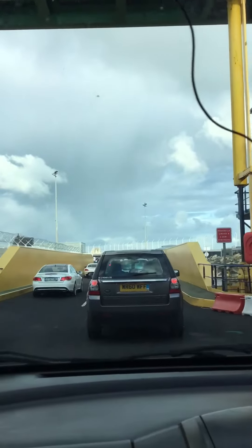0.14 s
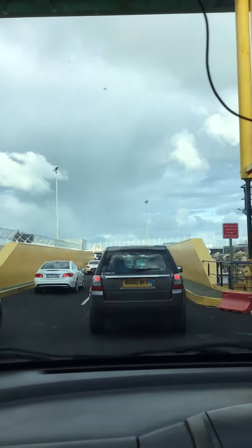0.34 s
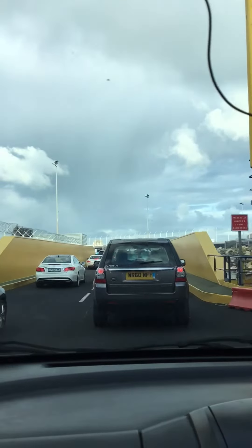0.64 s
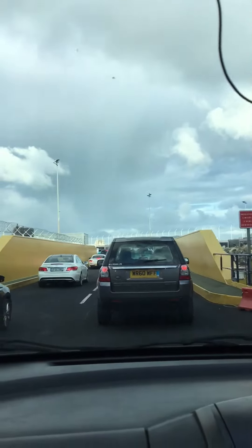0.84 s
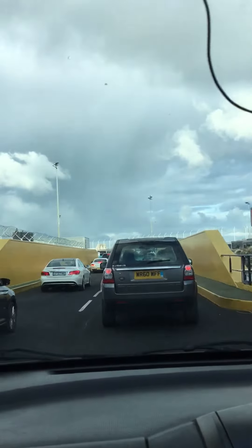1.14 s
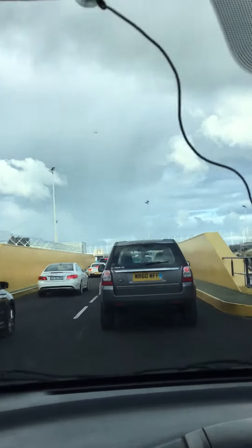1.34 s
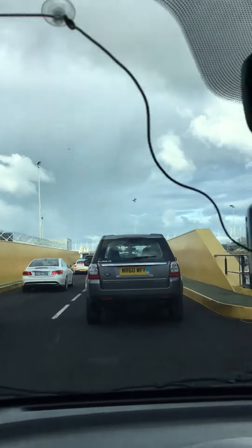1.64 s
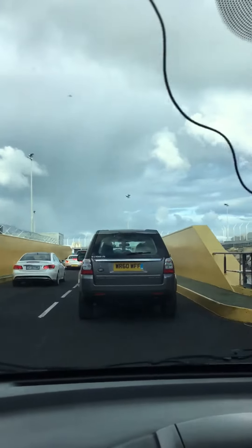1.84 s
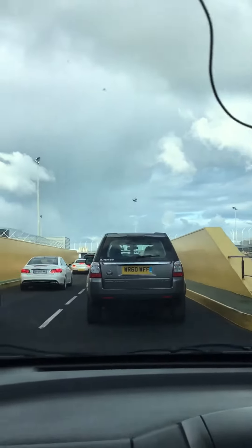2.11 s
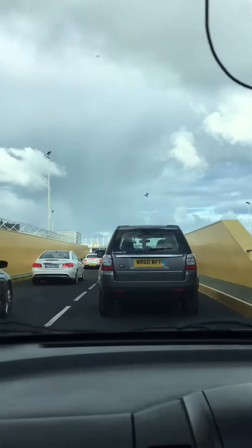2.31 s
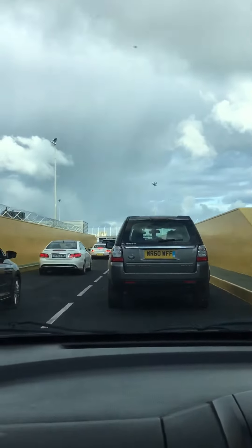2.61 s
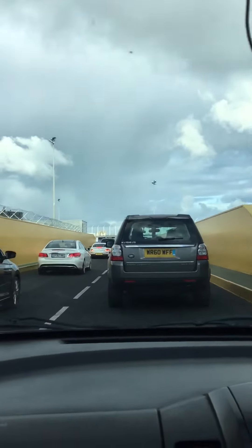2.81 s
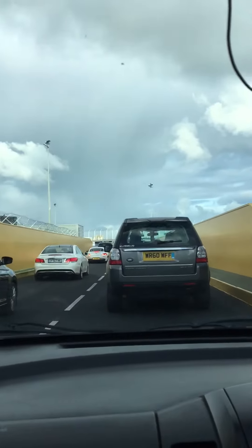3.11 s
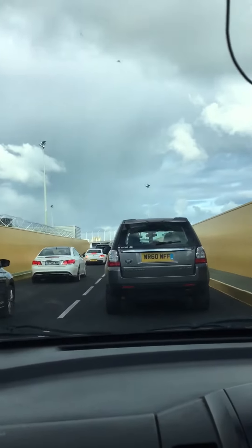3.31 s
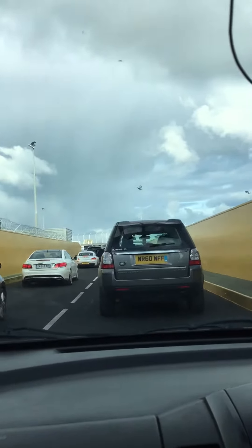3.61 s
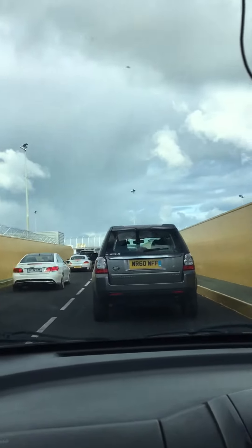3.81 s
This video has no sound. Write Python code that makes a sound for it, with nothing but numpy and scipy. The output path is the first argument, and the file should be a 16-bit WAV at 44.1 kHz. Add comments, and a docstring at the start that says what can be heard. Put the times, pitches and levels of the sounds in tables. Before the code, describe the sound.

Inside a slowly moving car, a low, wavering engine drone and muffled road rumble run throughout, with very faint window air. A boomy thump lands near 1.2 seconds, then clanking knocks cluster from 1.35 to 1.9, hardest around 1.65. Softer bumps follow near 2.3 and 3.0, a sharper plate knock at 3.55, and small trim ticks around 2.0 and 3.9. Close, bass-heavy phone pickup.

```python
"""Inside a car rolling slowly down a steel ramp, heard by a hand-held phone.
The engine drones as wandering sine orders; road and window air are coloured noise that flickers.
Body resonances murmur as narrow noise; joint thumps ring them as sines and clank the plate as noise.
A few plate notes sing out as dying sines, loose trim ticks in short noise scrapes,
and faint rustles come as patches of dense treble clicks."""
import sys
import numpy as np
from scipy import signal
from scipy.fft import rfft, irfft
from scipy.io import wavfile
from scipy.ndimage import uniform_filter1d

SR = 44100
rng = np.random.default_rng(int(sys.argv[2]) if len(sys.argv) > 2 else 0)


def wrap_up_sound(samples):
    """Save the sound to the file named by the first command line argument, as 16-bit audio."""
    columns = np.atleast_2d(samples).T
    # keep every value between -1 and 1, then stretch to whole-number steps
    tamed = np.clip(columns, -1, 1)
    steps = np.round(tamed * 32767).astype(np.int16)
    wavfile.write(sys.argv[1], SR, steps)


N = 174195  # samples

# Engine drone in the cabin boom. Each row: time in seconds, firing pitch in Hz before its wander,
# level in dB before the order balance.
ENGINE_DRONE = [(0.0, 62.2, -28.5), (0.08, 59.1, -29), (0.15, 59.8, -28.5), (0.19, 60.6, -38),
                (0.22, 60.2, -28), (0.3, 58.9, -38), (0.36, 57, -26), (0.42, 58, -44), (0.49, 55.1, -27.5),
                (0.57, 55.8, -39), (0.65, 56.3, -29), (0.74, 57.9, -49), (0.81, 58.03, -25),
                (0.83, 57.94, -35), (0.88, 58.1, -23), (0.93, 57.96, -41), (1.0, 57.95, -23),
                (1.02, 60, -44), (1.08, 59.25, -25.5), (1.14, 58.7, -36.5), (1.59, 58.77, -24.5),
                (1.64, 57.03, -32), (1.72, 59.6, -20.5), (1.79, 63.8, -49), (1.88, 58.7, -26.5),
                (1.92, 57.55, -24), (1.98, 56.5, -21.5), (2.08, 56.1, -62), (2.18, 54.8, -33.5),
                (2.3, 62.9, -29.5), (2.35, 63, -16), (2.5, 63.6, -39), (2.58, 57.6, -37), (2.76, 58.5, -44),
                (2.83, 55.7, -29), (2.93, 56.24, -49), (2.99, 54.57, -29.5), (3.07, 53.1, -31.5),
                (3.23, 58.06, -35), (3.28, 59.6, -40), (3.3, 59.66, -31), (3.53, 60.03, -33),
                (3.6, 60.0, -16.5), (3.64, 58.5, -26.5), (3.76, 53.2, -35), (3.78, 54.2, -32),
                (3.83, 54.14, -41), (3.95, 52.96, -21.5)]
# Engine orders. Each row: multiple of the firing pitch, balance in dB.
ENGINE_ORDERS = [(1, -1), (1.5, -15.5), (2, -16), (3, -23.5)]
FIRING_WANDER = 0.0288  # fraction of the pitch
LUMP_DB = 2  # spread for the firing order itself; grows with the multiple

# Colour of the road noise through the body. Each row: frequency in Hz, relative level in dB per Hz.
ROAD_COLOUR = [(20, -44.5), (32, -4.5), (45, -0.5), (65, -5.5), (85, -4.5), (159, -5.5), (210, -8.5),
               (261, -15.5), (340, -17), (419, -23), (720, -25.5), (880, -31), (1660, -40.5), (3000, -59),
               (6000, -82.5)]
# Road loudness. Each row: time in seconds, rms level in dB within the road band.
ROAD_LOUDNESS = [(0.0, -44), (0.68, -47.5), (1.0, -49.5), (1.68, -37), (2.02, -47), (2.51, -42.5),
                 (2.88, -48), (3.29, -45), (3.95, -44.5)]
# Colour of the air hiss at the windows. Each row: frequency in Hz, relative level in dB per Hz.
AIR_COLOUR = [(800, -2), (1600, 0), (3000, -8), (5500, -16), (7200, -25.5), (8600, -24), (10000, -30.5),
              (15700, -33.5)]
# Air loudness. Each row: time in seconds, rms level in dB within the air band.
AIR_LOUDNESS = [(0.0, -58), (1.52, -61), (1.65, -58.5), (1.97, -63), (2.62, -62.5), (3.9, -61.5)]
ROAD_BAND_HZ, AIR_BAND_HZ = (300, 1500), (2000, 7000)  # where the loudness is set
SWELL_DB, FLICKER_DB = 1.2, 1.37  # spread of the shared swell and of each slice's own flicker

# Body resonances rung by road and thumps. Each row: pitch in Hz, 60 dB decay time in seconds,
# rms level in dB of the road's murmur.
BODY_MODES = [(113.7, 0.34, -42.5), (143.8, 0.28, -42.5), (181.1, 0.17, -46.5), (204.8, 0.33, -46.5),
              (347.8, 0.17, -58)]

# Tiny-click rustles near the phone. Each row: start in seconds, length in seconds, peak rms level in dB.
RUSTLE_PATCHES = [(.08, .16, -80), (1.9, 0.12, -76), (2.269, .15, -73)]
RUSTLE_CLICKS_PER_S, RUSTLE_HZ, RUSTLE_WIDTH_HZ = 970, 10987, 10000

# Wheel thumps over the joints. Each row: start in seconds, rise in seconds, 60 dB decay time in seconds,
# rms levels in dB of the five body rings, then of the plate's thud, low clank, high clank and rattle.
JOINT_THUMPS = [(.935, 0.0083, 0.99, -48, -47.5, -48, -55.5, -75, -47, -51.5, -57, -89),
                (1.185, 0.014, 0.4, -18, -44, -28, -24.5, -39, -37.5, -42.5, -56, -75.5),
                (1.355, 0.0056, 0.3, -35, -37.5, -39, -33.5, -44, -45, -47, -59.5, -77),
                (1.465, 0.02, 0.39, -30.5, -34.5, -32, -33.5, -38.5, -41, -36.5, -40.5, -58.5),
                (1.554, 0.013, 0.67, -40.5, -33, -38, -36, -45, -49.5, -46.5, -60, -69.5),
                (1.615, 0.014, 0.44, -24, -35, -44.5, -30.5, -28, -27, -42, -43.5, -67),
                (1.66, 0.0027, 0.22, -27.5, -32, -27, -34, -32, -29.5, -33, -41, -40),
                (1.701, 0.0073, 0.53, -23.5, -20.5, -33, -24.5, -33, -30.5, -46, -57, -61.5),
                (1.885, 0.027, 0.56, -32, -31.5, -39, -29.5, -42, -42, -45, -69, -64.5),
                (2.280, 0.023, 0.49, -32, -37, -32, -40, -42, -37, -40.5, -48.5, -65.5),
                (2.340, 0.069, 1, -49, -37, -25.5, -37.5, -45, -45, -42, -57, -73.5),
                (3.012, 0.06, .6, -30, -40.5, -25, -47, -50, -40, -41.5, -50.5, -67),
                (3.080, .11, 0.76, -38, -44, -38.5, -41, -45, -47.5, -45, -54.5, -69),
                (3.546, 0.0046, 0.79, -49, -34.5, -34, -35, -39, -31.5, -36.5, -44, -61.5),
                (3.749, 0.016, 2.8, -55, -44, -38, -34, -48.5, -68, -78, -83, -101)]
# Plate resonances, grouped as thud, low clank, high clank and rattle.
# Each row in a group: pitch in Hz, width in Hz, balance in dB within the group.
PLATE_GROUPS = [
    [(255, 113, 3), (390, 119, -6.5), (518, 144, -3)],
    [(633, 193, 4), (749, 145, 2.5), (955, 170, -3), (1150, 280, -4.5)],
    [(1384, 330, 5.5), (1670, 320, 1), (1936, 470, 0.5), (2415, 600, -3.5)],
    [(3560, 800, 5.5), (4350, 870, -1.5), (5180, 540, -8.5), (6658, 600, -17.5)],
]
RING_WOBBLE = 0.0301  # fraction of the pitch

# Clear plate notes in the harder knocks. Each row: start in seconds, pitch in Hz, rms level in dB,
# rise in seconds, 60 dB decay time in seconds.
PLATE_PINGS = [(1.19, 744, -41, 0.0052, 0.22), (1.468, 1520, -41.5, 0.0033, 0.091),
               (1.485, 1340, -44, .005, .1), (1.49, 656, -40, .006, 0.24),
               (1.489, 3540, -54.5, .008, 0.098), (1.668, 977, -34.5, .015, 0.21),
               (1.725, 736, -38.5, 0.0071, .2), (2.36, 1292, -50, 0.018, 0.28),
               (3.547, 490, -31.5, 0.017, 0.21), (3.547, 1490, -40.5, 0.012, 0.1)]

# Trim ticks. Each row: start in seconds, length in seconds (loudest halfway), dull level in dB,
# bright level in dB, dull pitch in Hz.
TRIM_TICKS = [(1.7125, 0.0038, -64, -62, 3600), (1.923, 0.0044, -62, -65, 3730),
              (1.941, 0.0046, -64, -65, 3400), (2.011, 0.0034, -72, -62, 3610),
              (2.0165, 0.016, -54, -61.5, 3500), (2.333, 0.0038, -64, -68, 3400),
              (2.365, 0.0041, -72, -73.5, 3400), (2.39, 0.0038, -70, -71, 3370),
              (2.8208, 0.002, -54, -59.5, 3800), (3.902, 0.0043, -54, -75, 3535),
              (3.919, .012, -46, -81, 2335)]
DULL_WIDTH_HZ, BROAD_HZ, BROAD_WIDTH_HZ = 720, 8500, 10000
SQUEAK_HZ, SQUEAK_WIDTH_HZ = 11800, 1600
SQUEAK_FULL_DB, SQUEAK_FULL_S = 9, 0.018  # dB over the hiss in a tick of this length; shorter ones get less

MIC_LOW_HZ, TOP_HZ = 34.8, 15750


def undb(db):
    """dB to gain."""
    return 10 ** (np.asarray(db) / 20)


def unit(x):
    """Scale to rms 1."""
    return x / np.sqrt(np.mean(x ** 2))


def curve(table, column=1):
    """A column of a time table, drawn sample by sample with straight lines."""
    rows = np.array(table)
    return np.interp(np.arange(N) / SR, rows[:, 0], rows[:, column])


def band(hz, width_hz, count=N):
    """Noise through a resonance applied twice, rms 1."""
    b, a = signal.iirpeak(hz, hz / width_hz, fs=SR)
    noise = rng.standard_normal(count + 2000)
    once = signal.lfilter(b, a, noise)
    return unit(signal.lfilter(b, a, once)[2000:])  # skip the filter's start-up


def walk(rate):
    """Random levels, rate per second, smoothed twice; spread near 1."""
    hold = int(SR / rate)
    steps = np.repeat(rng.standard_normal(N // hold + 1), hold)
    return 1.3 * uniform_filter1d(uniform_filter1d(steps, hold), hold)[:N]


def coloured(colour, edges):
    """Coloured noise, rms 1 between the edges before its half-octave slices swell together and flicker alone."""
    hz = np.maximum(np.arange(N // 2 + 1) * SR / N, 1)
    rows = np.array(colour)
    tilt_db = np.interp(np.log(hz), np.log(rows[:, 0]), rows[:, 1], left=-99)
    spectrum = rfft(rng.standard_normal(N)) * undb(tilt_db)
    in_band = (hz > edges[0]) * (hz < edges[1])
    spectrum = spectrum / np.std(irfft(spectrum * in_band, N))
    place = 2 * np.log2(hz / 20)  # half octaves above 20 Hz
    swell = SWELL_DB * walk(5.94)
    out = np.zeros(N)
    for k in range(21):
        piece = irfft(spectrum * np.clip(1 - abs(place - k), 0, 1), N)
        out += piece * undb(swell + FLICKER_DB * walk(14))
    return out


def strike(t, rise, t60):
    """Knock envelope: a straight rise, then an exponential fall of 60 dB in t60."""
    return np.clip(t / rise, 0, 1) * np.exp(-np.log(1000) * np.maximum(t - rise, 0) / t60)


def engine():
    """Firing orders on one wandering pitch, each lumping in level on its own."""
    turns = np.cumsum(curve(ENGINE_DRONE) * (1 + FIRING_WANDER * walk(12))) / SR
    tone = np.zeros(N)
    for multiple, db in ENGINE_ORDERS:
        lump_db = LUMP_DB * multiple * walk(14)
        tone += undb(db + lump_db) * np.sin(2 * np.pi * (multiple * turns + rng.random()))
    return np.sqrt(2) * tone * undb(curve(ENGINE_DRONE, column=2))


def road():
    """Tyre rumble through the floor and air past the windows, both as broad coloured noise."""
    tyres = coloured(ROAD_COLOUR, ROAD_BAND_HZ) * undb(curve(ROAD_LOUDNESS))
    air = coloured(AIR_COLOUR, AIR_BAND_HZ) * undb(curve(AIR_LOUDNESS))
    return tyres + air


def body_hum():
    """The road keeps the body resonances murmuring; longer decay means a narrower band."""
    return sum(undb(db) * band(hz, 2 * 2.3 / t60) for hz, t60, db in BODY_MODES)


def rustles():
    """Tiny clicks, each a short puff of treble noise, in patches that swell and fade."""
    t = np.arange(N) / SR
    clicks = (rng.random(N) < RUSTLE_CLICKS_PER_S / SR).astype(float)
    puffs = uniform_filter1d(clicks, size=60)
    grain = unit(puffs * band(RUSTLE_HZ, RUSTLE_WIDTH_HZ))
    level = np.zeros(N)
    for at, length, db in RUSTLE_PATCHES:
        level += undb(db) * np.sin(np.pi * np.clip((t - at) / length, 0, 1))
    return grain * level


def thumps():
    """Each joint rings the body modes and shakes the plate's resonances for a moment."""
    out, t = np.zeros(N + 2 * SR), np.arange(SR) / SR
    plate = []
    for group in PLATE_GROUPS:
        plate.append(unit(sum(undb(db) * band(hz, width, count=N + SR) for hz, width, db in group)))
    # the panels flex, so each mode's pitch wobbles
    bends = [np.pad(np.cumsum(RING_WOBBLE * walk(30)) / SR, (0, SR), mode="edge") for _ in BODY_MODES]
    for at, rise, t60, *levels_db in JOINT_THUMPS:
        span = slice(int(at * SR), int(at * SR) + SR)
        for db, (hz, own_t60, _), bend in zip(levels_db, BODY_MODES, bends):
            # decay lies between the thump's and the mode's own
            env = strike(t, rise, np.sqrt(t60 * own_t60))
            tone = np.sin(2 * np.pi * (hz * (t + bend[span]) + rng.random()))
            out[span] += undb(db) * np.sqrt(2) * env * tone
        clank = sum(undb(db) * noise[span] for db, noise in zip(levels_db[5:], plate))
        out[span] += strike(t, rise, t60) * clank
    return out[:N]


def pings():
    """Single plate modes, struck once and dying away."""
    out, t = np.zeros(N + SR), np.arange(SR // 2) / SR
    for at, hz, db, rise, t60 in PLATE_PINGS:
        start = int(at * SR)
        tone = np.sqrt(2) * np.sin(2 * np.pi * hz * t)
        out[start:start + SR // 2] += undb(db) * strike(t, rise, t60) * tone
    return out[:N]


def ticks():
    """Short scrapes of plastic trim: a dull note, a broad hiss, and a thin squeak that needs time to speak."""
    out, size = np.zeros(N + SR), SR // 10
    t = np.arange(size) / SR
    for at, length, dull_db, bright_db, hz in TRIM_TICKS:
        start, u = int(at * SR), 2 * t / length
        env = u * np.exp((1 - u ** 2) / 2)  # peaks at 1 when u = 1
        squeak_gain = undb(SQUEAK_FULL_DB) * length / SQUEAK_FULL_S
        squeak = squeak_gain * band(SQUEAK_HZ, SQUEAK_WIDTH_HZ, count=size)
        bright = band(BROAD_HZ, BROAD_WIDTH_HZ, count=size) + squeak
        dull = band(hz, DULL_WIDTH_HZ, count=size)
        out[start:start + size] += env * (undb(dull_db) * dull + undb(bright_db) * bright)
    return out[:N]


def scene():
    """All sources summed at one microphone."""
    return (engine() + road() + body_hum() + rustles() + thumps() + pings() + ticks())[None]


def record(dry):
    """The phone drops the deepest bass and cuts the top steeply."""
    low_cut = signal.butter(4, MIC_LOW_HZ, "high", fs=SR, output="sos")
    top_cut = signal.ellip(10, .2, 70, TOP_HZ, fs=SR, output="sos")
    return signal.sosfilt(top_cut, signal.sosfilt(low_cut, dry))


dry = scene()
out = record(dry)
wrap_up_sound(out)
```